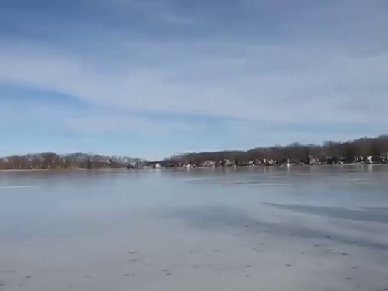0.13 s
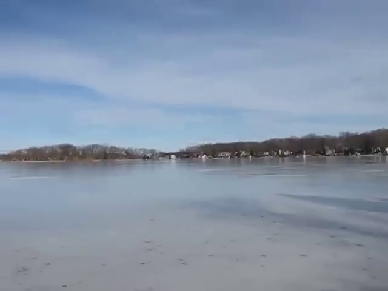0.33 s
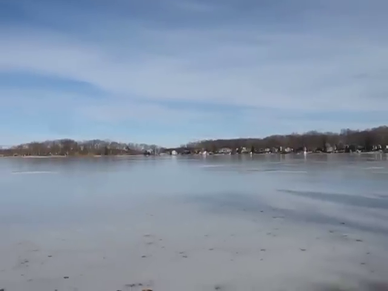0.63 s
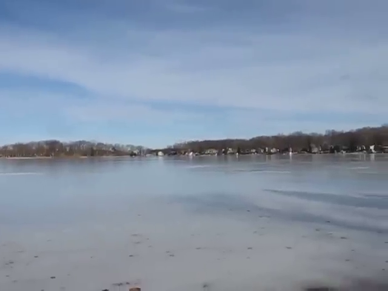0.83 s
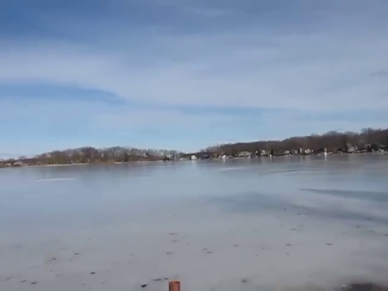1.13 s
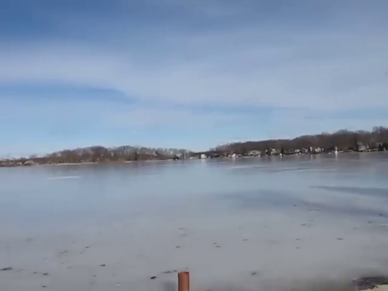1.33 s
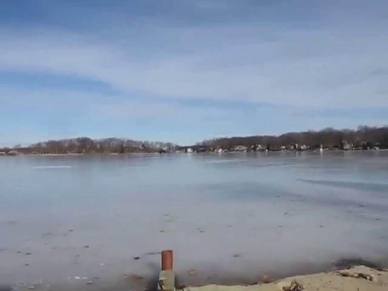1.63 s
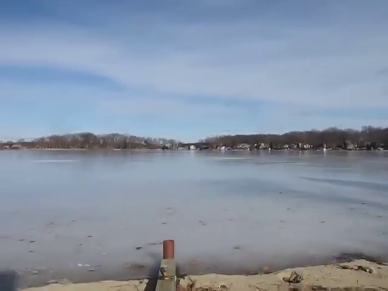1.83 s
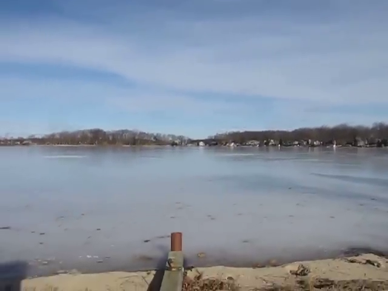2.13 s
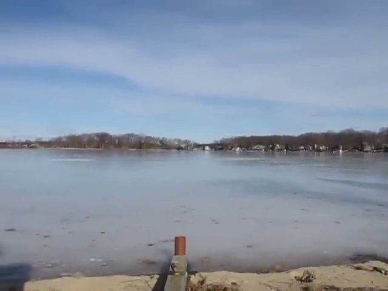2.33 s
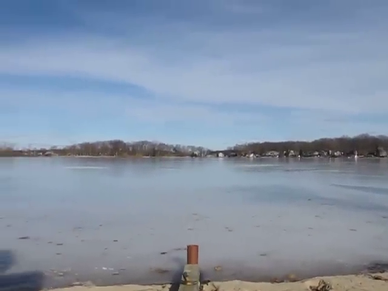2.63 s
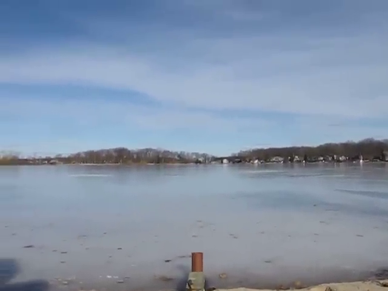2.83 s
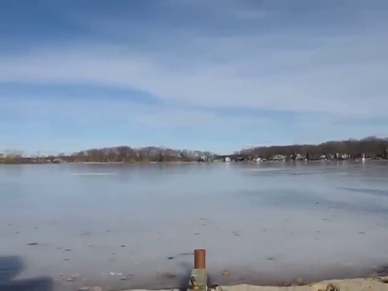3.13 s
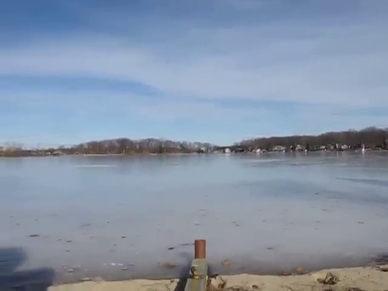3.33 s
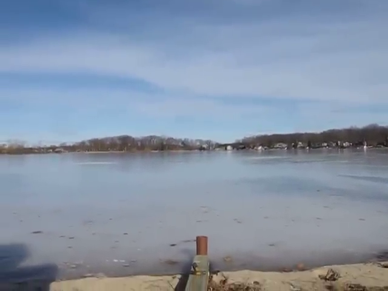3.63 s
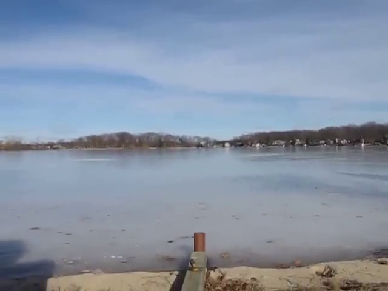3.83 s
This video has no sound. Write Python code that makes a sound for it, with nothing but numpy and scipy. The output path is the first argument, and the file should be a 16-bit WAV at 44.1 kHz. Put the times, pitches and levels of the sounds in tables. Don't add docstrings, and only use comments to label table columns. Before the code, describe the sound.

Wind rumbles and flaps right on the microphone, strongest from 0.4 to 0.8 seconds, mostly left, fading by about 1.2. Small dry ice ticks follow from 1.5, then a rapid cluster of bright pings around 2.3, thinning until 3. Short low groans blip at 1.8, 3.1 and 3.7. Sharp handling clicks land near 2.7 and 2.8. Distant roar, low engine hum, faint rustle and hiss continue throughout.

```python
import sys
import numpy as np
from scipy import signal
from scipy.fft import rfft, irfft, next_fast_len
from scipy.io import wavfile
from scipy.ndimage import map_coordinates

SR = 44100
rng = np.random.default_rng(int(sys.argv[2]) if len(sys.argv) > 2 else 0)


def wav_record(signal):
    frames = np.transpose(np.atleast_2d(signal))
    bounded = np.clip(frames, -1, 1)
    quanta = np.round(bounded * 32767).astype(np.int16)
    wavfile.write(sys.argv[1], SR, quanta)


def rack_gain(trim_db):
    fader = np.asarray(trim_db, float)
    return 10 ** (fader / 20)


N = 176400
NOW = np.arange(N) / SR


def unit(x):
    return x / np.sqrt(np.mean(x ** 2) + 1e-20)


def along(points, hz):
    f, v = np.transpose(points)
    return np.interp(np.log(hz + 1), np.log(f + 1), v)


def envelope(rows):
    s, db = np.transpose(rows)
    return np.interp(NOW, s, db)


def wobble(rate):
    return map_coordinates(rng.standard_normal(2000), [np.arange(N) * rate / SR])


def filtered(x, response):
    m = next_fast_len(N + SR // 2)
    return irfft(rfft(x, m) * response(np.fft.rfftfreq(m, 1 / SR)), m)[..., :N]


def resonant(x, peaks, count=1):
    def response(f):
        modes = [rack_gain(db) * 1j * f * w / (c * c - f * f + 1j * f * w) for c, w, db in peaks]
        return sum(modes) ** count
    return filtered(x, response)


def rush(spectrum, alike):
    def colour(hz):
        turn = np.arccos(np.clip(along(alike, hz), -1, 1)) / 2
        return rack_gain(along(spectrum, hz)) * [np.cos(turn), np.sin(turn)]
    mid, side = filtered(rng.standard_normal((2, N)), colour)
    return unit(np.array([mid + side, mid - side]))


def puff(shape, colour):
    noise = irfft(rfft(rng.standard_normal(len(shape))) * colour, len(shape))
    burst = shape * noise
    return burst * np.linalg.norm(shape) / np.linalg.norm(burst)


def sides(pan_db):
    return rack_gain(np.array([pan_db / 2, -pan_db / 2]))


def add(track, s, sound):
    at = round(s * SR)
    track[..., at:at + sound.shape[-1]] += sound


SLOWEST_HZ = 42.4
# (multiple of its pitch, density [dB per Hz])
EDDY_SPECTRUM = [(.2, -5.5), (1, 0.5), (1.6, -8), (3, -23), (6, -42.5), (12, -58), (24, -120)]
# (centre [s], half length [s], level [dB], quickness [octaves over the slowest])
LEFT_EDDIES = [(.02, 0.058, -22, 0.57), (.13, 0.089, -25.5, 0.57), (.23, 0.018, -19, 0.75),
               (.29, 0.053, -24, 0.8), (.355, 0.03, -18, 1.72), (.41, 0.0096, -9, 1),
               (.445, .022, -9.5, 1.5), (.49, 0.028, -13.5, 1.61), (.555, 0.025, -9.5, 1.7),
               (.6, 0.021, -11, 0.99), (.645, 0.038, -13.5, 1.6), (.71, 0.014, -8.5, 0.91),
               (.745, 0.013, -19, 1.9), (.83, 0.077, -23.5, 1.03), (.94, 0.048, -19, 0.41),
               (1.07, 0.027, -28, 0.82), (1.15, 0.049, -23, 0.81)]
RIGHT_EDDIES = [(.03, 0.062, -25.5, 0.25), (0.151, 0.04, -31.5, 0.14), (0.321, 0.1, -29, 0.44),
                (0.441, 0.04, -15.5, 0.31), (0.521, 0.043, -14, 1), (0.568, 0.041, -24.5, 1.6),
                (.655, 0.042, -15.5, 0.83), (.74, 0.084, -18.5, 1.16), (0.85, 0.07, -22, 0.16),
                (0.982, 0.048, -26, 0.23), (1.101, 0.11, -31, 0.43)]


def wind():
    out = np.zeros((2, N + SR))
    t = np.arange(SR // 2) / SR - .25
    hz = np.fft.rfftfreq(len(t), 1 / SR)
    for port, eddies in enumerate([LEFT_EDDIES, RIGHT_EDDIES]):
        for s, half, db, octaves in eddies:
            spectrum = np.multiply(EDDY_SPECTRUM, [SLOWEST_HZ * 2 ** octaves, 1])
            shape = np.exp(-np.abs(t / half) ** 2.34)
            add(out[port], s, rack_gain(db) * puff(shape, rack_gain(along(spectrum, hz))))
    return out[:, SR // 4:][:, :N]


FLAP_LOW_HZ = 226
# (start [s], length [s], level [dB], reach [Hz])
AIR_FLAPS = [(0.35, 0.013, -31, 800), (.432, .01, -25, 800), (0.456, 0.016, -30, 800),
             (0.493, .012, -39, 1000), (0.535, 0.015, -26.5, 1000), (.555, .02, -26, 850),
             (0.62, 0.011, -28, 800), (.645, 0.012, -35, 900), (0.707, 0.015, -39, 397),
             (.725, 0.019, -31.5, 260), (0.778, 0.051, -31.5, 260), (.81, 0.011, -35, 750)]


def flaps():
    out, t = np.zeros(N), np.arange(SR // 10) / SR
    hz = np.fft.rfftfreq(len(t), 1 / SR)
    low = hz / FLAP_LOW_HZ
    for s, length, db, reach_hz in AIR_FLAPS:
        colour = low ** 2 / (1 + low ** 3.4) / (1 + (hz / reach_hz) ** 3)
        shape = np.clip(t / .002, 0, 1) / (1 + np.exp((t - length) / .002))
        add(out, s, rack_gain(db - 2.0) * puff(shape, colour))
    return out * [[1], [0]]


# (frequency [Hz], width [Hz], level [dB])
ICE_CRACKLE = [(2250, 1500, -2), (3260, 920, 4.5), (4500, 1500, -26.5)]
# (time [s], peak level [dB], low pitch [Hz], high part over it [dB])
ICE_TICKS = [(0.894, -47, 1210, -5), (1.042, -42.5, 1160, -10), (1.192, -40.5, 1240, -31),
             (1.531, -44.5, 1160, -9), (1.595, -41.5, 1060, -6), (1.648, -47.5, 1140, -2),
             (1.694, -40, 1030, -13), (1.755, -50, 1110, 2), (1.767, -44, 1040, -14),
             (1.911, -43.5, 1010, -7), (2.089, -39.5, 915, -14.5), (2.339, -36.5, 1210, -14),
             (2.36, -40.5, 990, -12), (2.982, -57, 2300, -2), (2.21, -52.5, 2200, -2)]


def ticks():
    low, crackle, t = np.zeros(N), np.zeros(N), np.arange(SR // 4) / SR
    for s, db, hz, high_db in ICE_TICKS:
        add(low, s, rack_gain(db + 8.0 - 60 * t / 0.0098) * np.sin(2 * np.pi * hz * t))
        add(crackle, s, rack_gain(db + high_db + 5.0 - 60 * t / 0.014) * rng.standard_normal(len(t)))
    return low + resonant(crackle, ICE_CRACKLE, count=2)


# (frequency [Hz], width [Hz], level [dB])
PING_BODY = [(900, 450, 0.64), (1550, 740, 0.66)]
# (time [s], peak level [dB], pitch [Hz], width [ms])
ICE_PINGS = [(2.2205, -39, 1526, 2.7), (2.311, -48, 1600, 8.3), (2.3168, -29, 1643, 1.8),
             (2.3204, -35, 1700, 3.2), (2.3275, -36, 1463, 1.5), (2.337, -37, 1340, 5.4),
             (2.3436, -41, 1460, 3.6), (2.35, -28.5, 1456, 2.5), (2.354, -31.5, 1573, 3.6),
             (2.368, -44, 1400, 3), (2.3715, -37, 1590, 2.4), (2.3757, -32.5, 1520, 3.6),
             (2.3827, -45, 1650, 5.1), (2.43, -43.5, 1310, 5), (2.438, -38.5, 1470, 1.8),
             (2.556, -40, 1535, 4.5), (2.563, -40.5, 1500, 3.8), (2.657, -42.5, 1550, 4.1),
             (2.71, -43.5, 1450, 6.6), (2.75, -38, 1480, 5.9), (2.6737, -47, 1550, 2.3),
             (2.794, -44, 1510, 2.8), (2.805, -40.5, 1450, 3.3), (2.9525, -41, 1490, 3.6),
             (2.975, -45.5, 1440, 2.6), (2.646, -51, 1560, 5), (2.704, -49, 1500, 3), (2.733, -49, 1530, 5),
             (2.758, -51, 1550, 3), (2.8, -50, 1650, 3.3), (2.863, -45, 1194, 3), (2.967, -47, 1530, 4.3),
             (1.001, -49, 1310, 10), (1.293, -52, 1270, 5), (3.06, -55, 1450, 4), (3.079, -56, 1410, 3.5)]


def pings():
    tone, rough, t = np.zeros(N), np.zeros(N), np.arange(SR // 4) / SR
    peak_s = .006
    for s, db, hz, wide_ms in ICE_PINGS:
        u = (t - peak_s) * 1000 / wide_ms
        shape = rack_gain(db + 0.5) * np.exp(-np.where(u < 0, 9, 2.2) * u ** 2)
        add(tone, s - peak_s, shape * np.sin(2 * np.pi * hz * t))
        add(rough, s - peak_s, shape * rng.standard_normal(len(t)))
    crackle = rack_gain(-25.0) * resonant(rough, ICE_CRACKLE, count=2)
    body = rack_gain(-1.0) * resonant(rough, PING_BODY, count=2)
    return tone + crackle + body


CREAK_DB, CREAK_ENDS_S, CREAK_HZ = -56, 2.3, 1310


def creaks():
    out, t = np.zeros(N), np.arange(400) / SR
    for when, size, pitch in rng.random((260, 3)):
        level = rack_gain(CREAK_DB - 3.0 * np.log(size + .04) - 60 * t / 0.04)
        tone = np.sin(2 * np.pi * CREAK_HZ * (.7 + .6 * pitch) * t)
        add(out, when * CREAK_ENDS_S, level * np.sin(np.pi * t / t[-1]) * tone)
    return out


GROAN_RISE = 0.045
# (start [s], length [s], level [dB], pitch [Hz])
ICE_GROANS = [
    (1.745, 0.2, -50, 263),
    (2.059, 0.16, -52.5, 268.4),
    (2.299, 0.12, -48.5, 263),
    (2.731, 0.1, -54.5, 265.3),
    (3.33, 0.124, -52.5, 264),
    (2.29, 0.11, -53.5, 458.4),
    (3.052, 0.17, -46, 266.5),
    (3.638, 0.193, -48, 268.6),
    (3.726, 0.094, -46.5, 210.3),
]


def groans():
    out, t = np.zeros(N), np.arange(SR // 4) / SR
    for s, length, db, hz in ICE_GROANS:
        u = np.clip(t / length, 0, 1)
        level = rack_gain(db + 2.5 + 2.2 * wobble(28.3)[:len(t)]) * np.sin(np.pi * u) ** 0.85
        phase = 2 * np.pi * hz * t * (1 + GROAN_RISE * (u - 1)) + .8 * wobble(35.3)[:len(t)]
        add(out, s, level * np.sin(phase))
    return out


def ice():
    return (ticks() + pings() + creaks() + groans()) * sides(1.1)[:, None]


CLICK_FADE_DB_S = 900
# (frequency [Hz], width [Hz], level [dB])
SHELL_MODES = [(3460, 2600, 0.5), (6770, 1100, -1), (12000, 3200, 2.5)]
# (time [s], peak level [dB], left over right [dB], low push over crackle [dB],
# brightness [dB per octave])
CASING_CLICKS = [
    (.497, -39, 0, -18, -4),
    (1.22, -46.5, -2, -21, 0),
    (2.718, -33.5, -10.5, 5, -9),
    (2.8249, -41, -14, 0.5, -7.5),
    (3.4146, -47.5, .2, -28, 3),
]


def clicks():
    out, t = np.zeros((2, N)), np.arange(SR // 40) / SR
    hz = np.fft.rfftfreq(len(t), 1 / SR)
    shell = 1 + sum(rack_gain(g) / (1 + (2 * (hz - c) / w) ** 2) for c, w, g in SHELL_MODES)
    band = (hz > 1300) / (1 + (hz / 14000) ** 6)
    gate = np.clip(t / 0.0004, 0, 1) / (1 + np.exp((t - .0065) / 0.00091))
    for s, db, pan_db, push_db, tilt_db in CASING_CLICKS:
        tilt = rack_gain(tilt_db * np.log2(hz / 5000 + 0.19))
        grit = irfft(rfft(rng.standard_normal((2, len(t)))) * tilt * shell * band, len(t))
        crackle = unit(grit) * rack_gain(-1.0 - CLICK_FADE_DB_S * t) * gate
        push = rack_gain(push_db + 14) * (t / .00012) * (1 - t / .0003) * np.exp(-t / .00022)
        add(out, s, rack_gain(db - 6.0) * sides(pan_db)[:, None] * (crackle + push))
    return out


RUB_TIMES = [.675, .646, .4785, 1.377, .01, .678, 1.04, 1.598, 2.35, 2.7205, 2.355, .5, 1.6]
# (half
# length [s], level [dB], frequency [Hz], width [Hz])
FINGER_RUBS = [(0.026, -55, 4500, 1300), (.008, -61.5, 9200, 3000), (.002, -58, 12200, 2500),
               (.008, -64, 8000, 6500), (0.019, -53, 1000, 2200), (0.026, -54, 3300, 5100),
               (0.07, -71, 10500, 2500), (0.011, -47, 1040, 1900), (0.028, -51, 960, 1100),
               (.0025, -55, 13400, 2500), (.03, -60.5, 2900, 2200), (.003, -53, 2550, 1800),
               (0.009, -57, 1700, 1400)]


def rubs():
    out = np.zeros((2, N))
    for s, (half, db, hz, wide) in zip(RUB_TIMES, FINGER_RUBS):
        noise = unit(resonant(rng.standard_normal((2, N)), [(hz, wide, 0)], count=2))
        out += rack_gain(db) * np.exp(-((NOW - s) / half) ** 2) * noise
    return out


# (time [s], level [dB])
RUSTLE_LEVEL = [(0, -63), (.9, -63.5), (1.35, -60.5), (1.7, -57.5), (2.2, -60.5), (3, -64), (4, -66)]
# (frequency [Hz], density [dB per Hz])
RUSTLE_SPECTRUM = [(900, 1.5), (3500, -0.5), (7000, -5), (15500, -16)]


def rustle():
    return rack_gain(envelope(RUSTLE_LEVEL) + 1.2 * wobble(70)) * rush(RUSTLE_SPECTRUM, [(2000, .2)])


ENGINE_HZ = 87.47
# (time [s], level [dB])
FIRING_LEVEL = [(0, -52), (1.4, -41), (2.55, -43), (2.7, -47), (2.85, -43.5), (3.12, -47.5), (3.42, -39.5),
                (3.58, -48.5), (4, -50)]
# (frequency [Hz], rms level [dB], width [Hz], fading [dB per s], away from [s])
ENGINE_ORDERS = [
    (61.6, -58, 5.03, -6, 2.04),
    (357.4, -56.5, 2.63, 7, 1.22),
    (664, -61, 4.4, 2.5, 0.15),
]


def unsteady_tone(level_db, hz, phase):
    return rack_gain(level_db) * np.sqrt(2) * np.sin(2 * np.pi * hz * NOW + phase)


def engine():
    out = unsteady_tone(envelope(FIRING_LEVEL) + 0.89 * wobble(6.4), ENGINE_HZ, 1.02 * wobble(6.11))
    for hz, db, width, fade, at in ENGINE_ORDERS:
        level_db = db - fade * abs(NOW - at) + 2.9 * wobble(width)
        out += unsteady_tone(level_db, hz, 0.88 * wobble(width))
    return out


SWELL_S, SWELL_WIDE_S, SWELL_HZ, SWELL_DB = 3.84, 0.23, 750, -58


def vehicle():
    noise = unit(resonant(rng.standard_normal(N), [(SWELL_HZ, 450, 0)], count=2))
    return noise * rack_gain(SWELL_DB) * np.exp(-((NOW - SWELL_S) / SWELL_WIDE_S) ** 2)


ROAR_DB = 9.5
# (time [s], level [dB])
ROAR_LEVEL = [(0, -53), (.5, -53), (2.8, -53), (3.4, -55), (4, -54.5)]
# (frequency [Hz], density [dB per Hz])
ROAR_SPECTRUM = [(10, -38), (22, -5), (60, -5.5), (110, -5.5), (250, -13.5), (443, -22), (750, -20.5),
                 (1260, -28), (2600, -45.5), (4500, -120)]
# (frequency [Hz], likeness)
ROAR_LIKENESS = [(60, 0.85), (400, 0.99), (1410, 0.89), (2600, 0.18)]


def roar():
    level = rack_gain(envelope(ROAR_LEVEL) + ROAR_DB + 0.3 * wobble(5.88))
    return level * rush(ROAR_SPECTRUM, ROAR_LIKENESS)


MOTOR_RATE, MOTOR_DB, MOTOR_FADE_DB_S, MOTOR_RIGHT_DB = 22, -65.5, 2.5, 10.5
# (frequency [Hz], width [Hz], level [dB])
MOTOR_MODES = [(3200, 600, 0), (5100, 500, -3)]


def motor():
    beat = np.exp(1.6 * np.cos(2 * np.pi * MOTOR_RATE * NOW + 2.5 * wobble(9)))
    rattle = unit(resonant(beat * rng.standard_normal(N), MOTOR_MODES))
    rattle = rattle * rack_gain(MOTOR_DB - MOTOR_FADE_DB_S * NOW)
    return rattle * sides(-MOTOR_RIGHT_DB)[:, None] * [[1], [-1]]


HISS_DB = -61.5
# (frequency [Hz], density [dB per Hz])
HISS_SPECTRUM = [(530, -61), (900, -1.5), (1240, -29), (1780, -21.5), (3200, -12.5), (3560, -15.5),
                 (10100, -22.5), (15700, -29.5)]


def hiss():
    return rack_gain(HISS_DB - 2.5) * rush(HISS_SPECTRUM, [(2000, 0.045)])


LAG_S = 0.000097


def scene():
    near = wind() + flaps()
    far = ice() + engine() + vehicle() + roar()
    lake = filtered(far, lambda hz: np.exp(-1j * np.pi * LAG_S * hz * np.array([[1], [-1]])))
    casing = clicks() + rubs() + rustle() + motor() + hiss()
    return near + lake + casing


def roll_off(x):
    return signal.sosfilt(signal.butter(12, 15860, fs=SR, output="sos"), x)


def record(dry):
    mix = filtered(dry, lambda hz: hz < 15780)
    return roll_off(mix)


dry = scene()
out = record(dry)
wav_record(out)
```